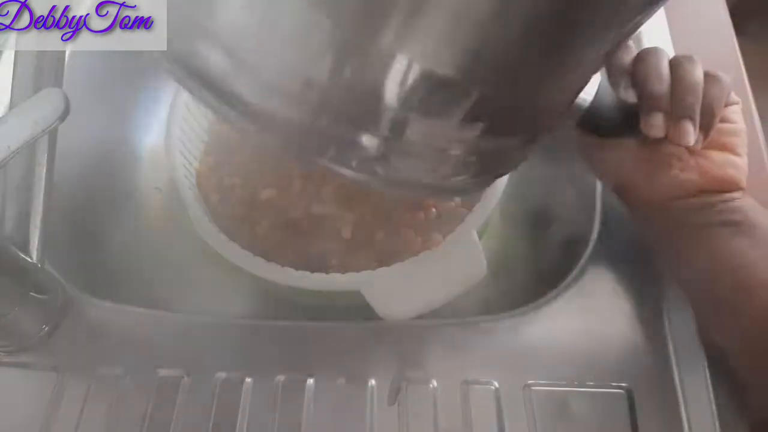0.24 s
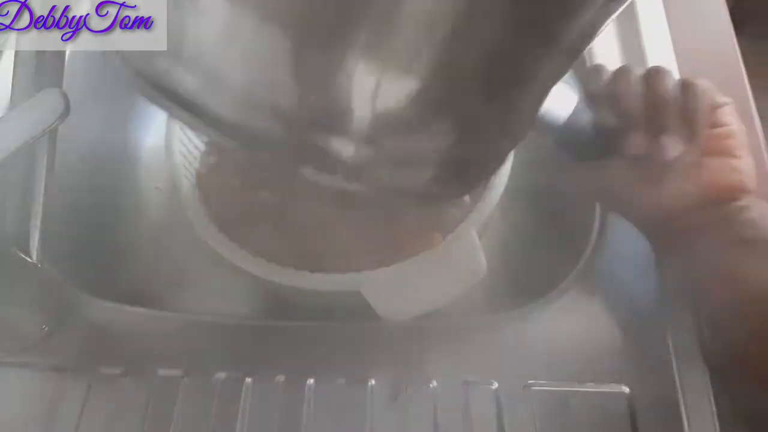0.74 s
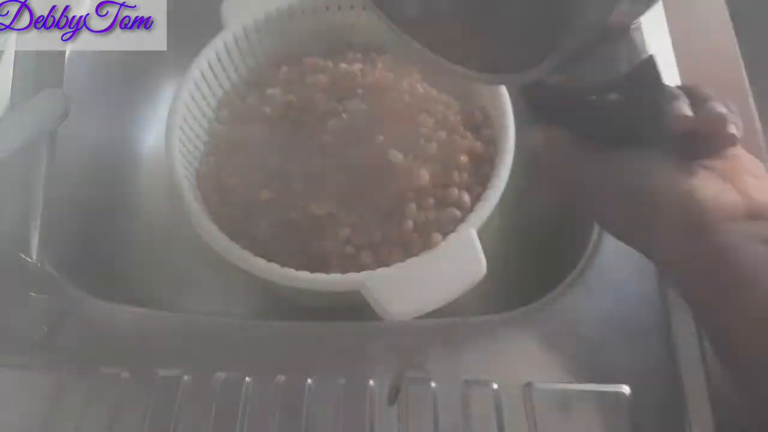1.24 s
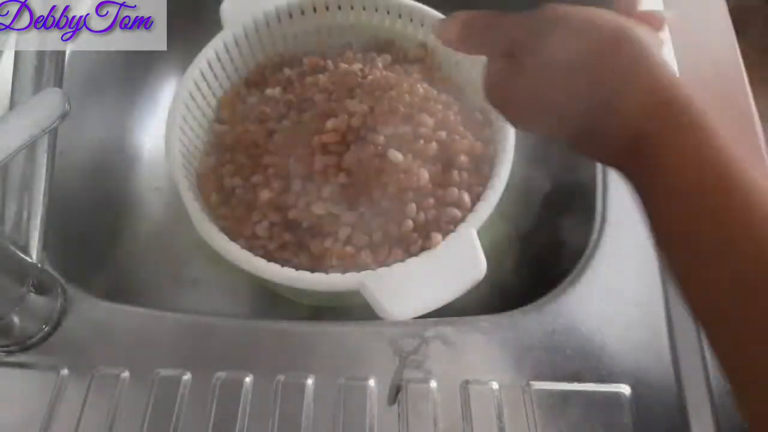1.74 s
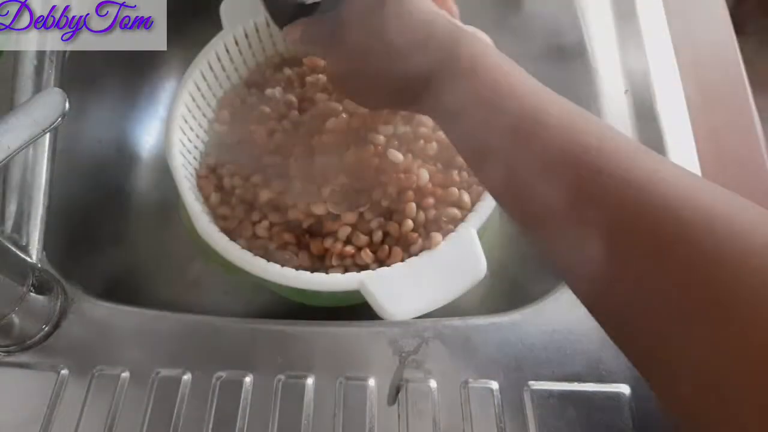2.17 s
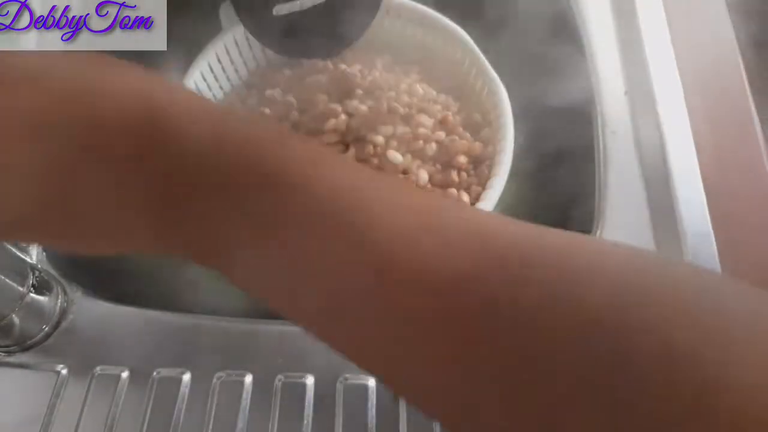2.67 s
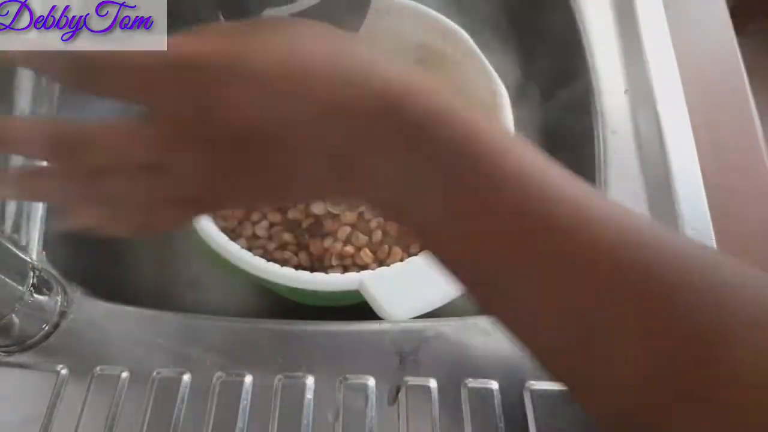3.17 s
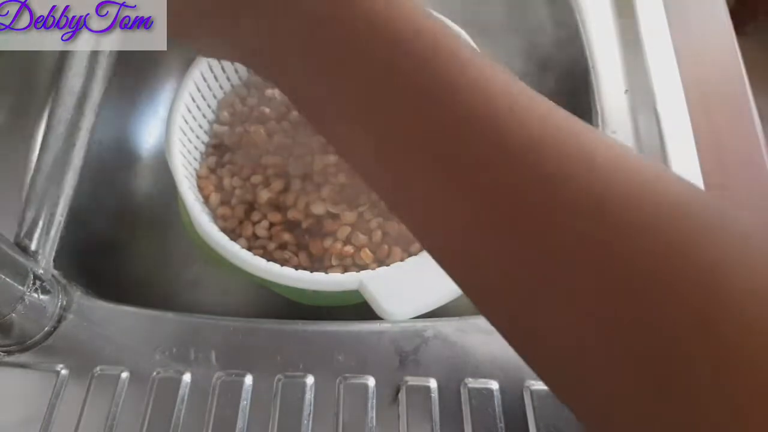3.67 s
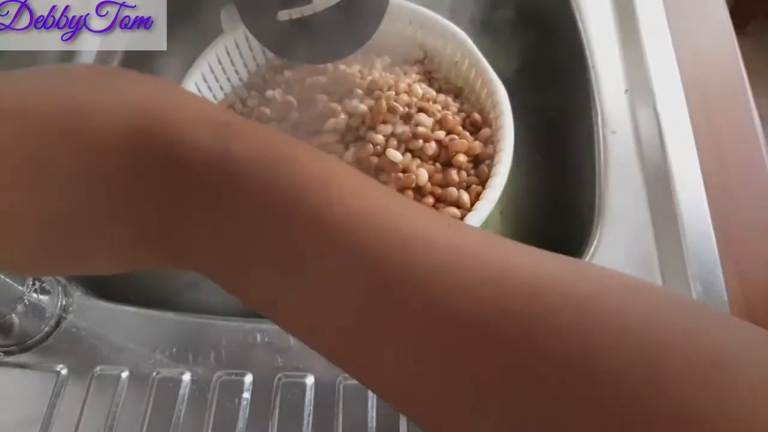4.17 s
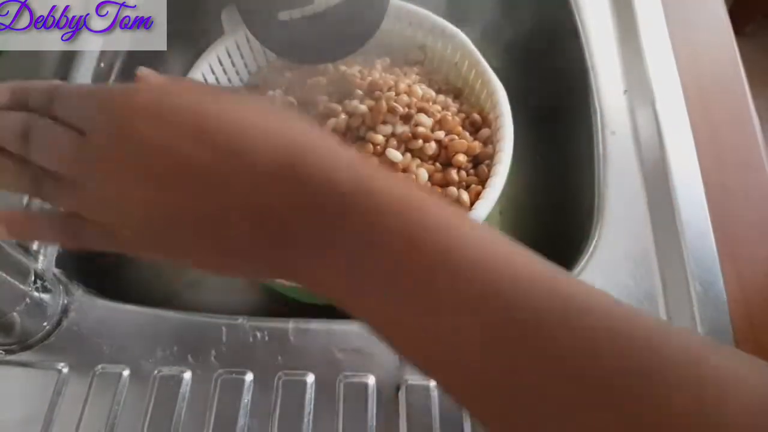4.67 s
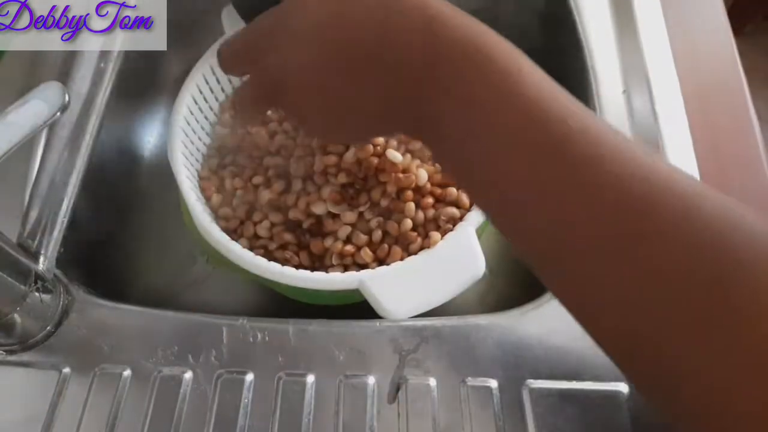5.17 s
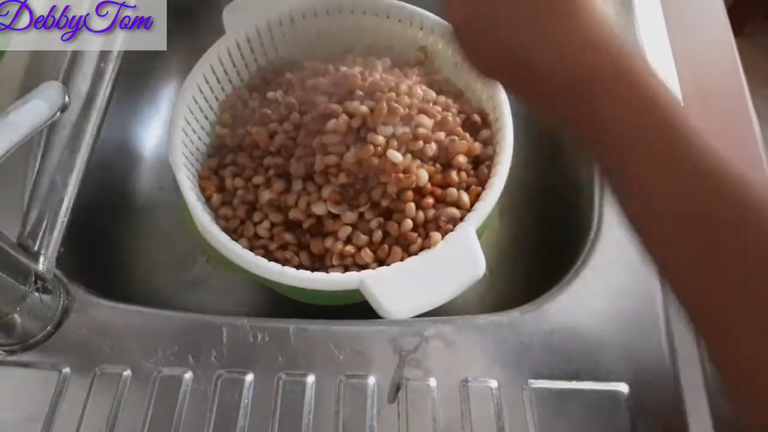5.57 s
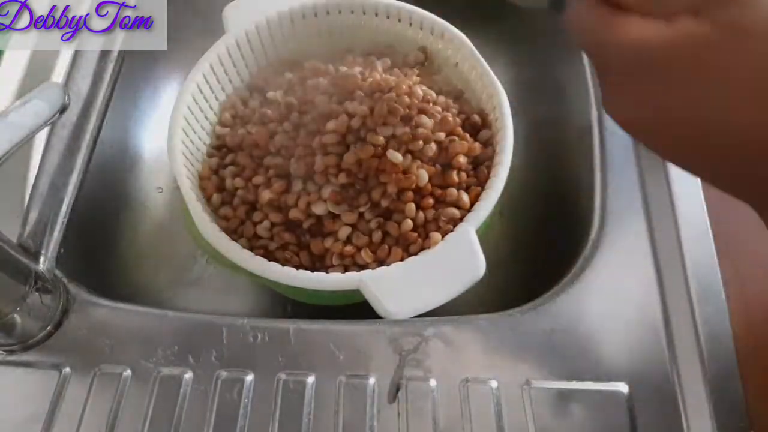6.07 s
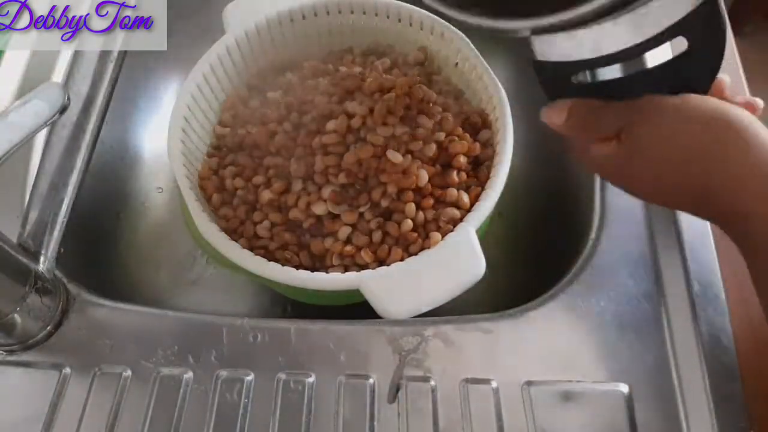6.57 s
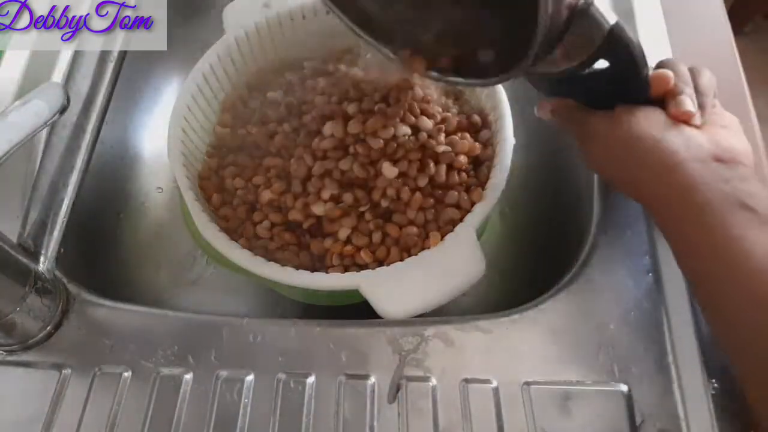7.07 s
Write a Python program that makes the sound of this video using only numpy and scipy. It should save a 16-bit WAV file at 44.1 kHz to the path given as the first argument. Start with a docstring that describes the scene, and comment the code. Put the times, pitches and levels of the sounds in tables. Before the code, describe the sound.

A metal pot is emptied over wet beans, with soft drumming and bubbling on the steel basin. A loud boomy knock comes next, with a brief low-mid resonant hum, then handling knocks and a steady tap stream lasting under two seconds. After it stops there are muffled thuds and a quieter gap, a sharp metal clatter, and fresh splashing. Close microphones, small kitchen with short hard reflections.

```python
"""Water drums on a steel sink as a pot is emptied over beans in a plastic colander, refilled and emptied again.
Drumming and gurgling are resonances fed by random drops; spray is banded hiss, the tap a smooth noise jet.
Splashes and drops are dying bursts of patter; water keeps single resonances sounding as narrow held tones.
Pot, hands and tap lever knock against the steel: short blows set basin and pot modes ringing
and are reflected by the kitchen."""
import sys
import numpy as np
from scipy import signal
from scipy.io import wavfile

SR = 44100
rng = np.random.default_rng(int(sys.argv[2]) if len(sys.argv) > 2 else 0)


def dump_mix(stems):
    """Bounce the given channels to the path in sys.argv[1] as a 16-bit WAV at rate SR."""
    frames = np.atleast_2d(stems).T  # one column per channel
    limited = np.clip(frames, -1, 1)  # hard clip at full scale
    pcm = np.round(limited * 32767).astype(np.int16)
    wavfile.write(sys.argv[1], SR, pcm)


N = 323253

# modes of the steel basin: (pitch [Hz], level [dB], decay t60 [s])
BASIN = [(100, -3.5, 0.13), (172, -1.5, 0.031), (200, -1, 0.062), (245.5, -7.5, 0.077), (331, 4.5, 0.032),
         (371, 5.5, 0.038), (490, -1, 0.04), (553, -4, 0.066), (631, -7.5, 0.12), (796, -12.5, 0.15)]
# modes of the steel pot ringing freely: (pitch [Hz], level [dB], decay t60 before damping [s])
POT = [(825, -7, 0.3), (1000, 1, 0.2), (1075, 0, 0.1), (1225, -14, 0.1), (1650, -3, 0.2),
       (1830, -4.5, 0.031), (2230, -7, 0.035), (2500, -12.5, 0.047), (2720, -11, 0.03), (3340, -18, 0.08),
       (3770, -11.5, .05), (4270, -15, 0.07), (4700, -22, 0.06)]
TAP_OPENS_S = 2.972


def from_db(db):
    """Decibels to gain."""
    return 10 ** (np.asarray(db) / 20)


def rms_one(x):
    """Scale to rms 1."""
    return x / np.sqrt(np.mean(x ** 2) + 1e-20)


def level_one(pair):
    """Scale a stereo pair so that its middle has rms 1."""
    return pair / np.sqrt(np.mean(pair.mean(axis=0) ** 2))


def in_time(rows):
    """Each column of a curve, sample by sample."""
    s, *columns = np.transpose(rows)
    return [np.interp(np.arange(N) / SR, s, column) for column in columns]


def at_hz(points, hz):
    """Read a spectrum on a log-frequency axis."""
    points_hz, values = np.transpose(points)
    return np.interp(np.log(hz), np.log(points_hz), values)


def drift(rate):
    """Slow random wander of rms 1, faster for a higher rate: smoothed noise drawn every 40 samples."""
    r = np.exp(-80 * np.pi * rate / SR)
    noise = rng.standard_normal(N // 40 + 2002)
    slow = signal.lfilter([1], [1, -2 * r, r * r], noise)[2000:]  # skip the filter's settling
    return np.interp(np.arange(N) / 40, np.arange(len(slow)), rms_one(slow))


def ring(clicks, hz, t60):
    """A unit click sets a sine ringing that starts at height 1 and dies by 60 dB in t60 seconds."""
    r, w = 10 ** (-3 / (t60 * SR)), 2 * np.pi * hz / SR
    return signal.lfilter([0, np.sin(w)], [1, -2 * r * np.cos(w), r * r], clicks + 1e-18)


def spread(mid_side, hz):
    """Two unrelated signals become left and right as alike as the microphones hear this pitch."""
    # (pitch [Hz], left-right likeness [-1 to 1])
    likeness = [(60, 0.69), (250, 0.9), (500, 0.81), (1000, -0.074), (16000, 0.0052)]
    # (pitch [Hz], left minus right [dB])
    lean = [(60, 22.5), (250, -1), (1000, 3.5), (4000, 2.5), (12000, 3.5)]
    signs = np.array([[1], [-1]])
    alike = np.clip(at_hz(likeness, hz), -1, 1)
    pair = np.sqrt(1 + alike) * mid_side[0] + np.sqrt(1 - alike) * mid_side[1] * signs
    return pair * from_db(at_hz(lean, hz) / 2 * signs)


def grains(per_s, uneven_db):
    """Random clicks of uneven size, two unrelated rows."""
    uneven = from_db(uneven_db * np.minimum(rng.exponential(1, (2, N)), 4))
    sizes = uneven * rng.standard_normal((2, N))
    return sizes * (rng.random((2, N)) < per_s / SR)


def banded(source, spectrum, patchy_db, rate):
    """Roughly half-octave bands of a noise, each with its own level and flicker."""
    together = drift(rate)
    lowest, highest = spectrum[0][0], spectrum[-1][0]
    edge_count = int(2 * np.log2(highest / lowest)) + 2
    edges = np.geomspace(lowest, min(highest * 1.1, .45 * SR), edge_count)
    out = 0
    for k, (low, high) in enumerate(zip(edges, edges[1:])):
        sos = signal.butter(2, [low, high], "band", fs=SR, output="sos")
        band = signal.sosfilt(sos, np.roll(source, 4001 * k, axis=1))  # shifted, so bands are unrelated
        hz = np.sqrt(low * high)
        flicker_db = patchy_db * (0.76 * together + drift(rate))
        out = out + from_db(at_hz(spectrum, hz) + flicker_db) * spread(band, hz)
    return level_one(out)


def rumble(modes, per_s, patchy_db, damping):
    """Dense drops keep a set of modes sounding; each mode swells and fades on its own."""
    patter = grains(per_s, uneven_db=0.5) * from_db(patchy_db * drift(7.2))
    out = 0
    for k, (hz, db, t60) in enumerate(modes):
        own = np.roll(patter, 3001 * k, axis=1) * from_db(patchy_db * drift(4))
        sounding = rms_one(ring(own, hz, damping * t60))  # damping is the share of t60 left
        out = out + from_db(db) * spread(sounding, hz)
    return level_one(out)


def ticks(per_s, low_hz, high_hz, cycles, tilt_db, clump_db):
    """Random clicks in clumps, dealt to resonators spread in pitch, each ringing for some cycles."""
    born = grains(per_s * from_db(clump_db * drift(18)), uneven_db=2.4)
    dealt = rng.integers(0, 18, N)
    out = 0
    for k, hz in enumerate(np.geomspace(low_hz, high_hz, num=18)):
        tick = ring(born * (dealt == k), hz, cycles / hz)
        out = out + from_db(tilt_db * np.log2(hz / 1000)) * spread(tick, hz)  # tilt per octave
    return level_one(out)


def bursts(rows, crest_db, rise_s):
    """Dying bursts of dense patter, each in its own band."""
    out, t = np.zeros((2, N + SR)), np.arange(SR // 2) / SR
    patter = grains(6000, uneven_db=2.0)
    for s, db, low_hz, high_hz, t60 in rows:
        i = int(s * SR)
        sos = signal.butter(2, [low_hz, high_hz], "band", fs=SR, output="sos")
        burst = signal.sosfilt(sos, np.roll(patter, -i, axis=1)[:, :len(t)])
        burst = level_one(spread(burst, np.sqrt(low_hz * high_hz)))
        shape = 10 ** (-3 * t / t60) * np.minimum(t / rise_s, 1)
        out[:, i:i + len(t)] += from_db(db - crest_db) * burst * shape  # crest: peak above rms
    return out[:, :N]


def kitchen(x):
    """Reflections of basin and walls: a dying noise tail for each side, weak in the bass."""
    t60_s, first_reflection_s = 0.19, .002
    t = np.arange(SR // 2) / SR
    tail = rng.standard_normal((2, len(t))) * 10 ** (-3 * t / t60_s) * (t > first_reflection_s)
    tail = signal.sosfilt(signal.butter(2, 500, "high", fs=SR, output="sos"), tail)
    return signal.fftconvolve(x, tail / np.sqrt(np.sum(tail ** 2) / 2), axes=1)[:, :N]


def cabinet_boom():
    """Dense drops excite the lowest modes of the sink cabinet."""
    # (pitch [Hz], level [dB], decay t60 before damping [s])
    cabinet = [(47, -13, 0.45), (100.7, -2, 0.43)]
    # (time [s], level [dB])
    booming = [(0.0, -46), (0.39, -44), (0.69, -35), (0.94, -43), (2.25, -44), (2.41, -27.5), (2.53, -48),
               (3.35, -47.5), (3.47, -39.5), (4.57, -40), (5.27, -37.5), (5.65, -41), (5.84, -49.5),
               (6.08, -49.5), (7.23, -37), (7.33, -31)]
    return from_db(in_time(booming)[0]) * rumble(cabinet, 3000, patchy_db=-1.1, damping=0.46)


def held_tones():
    """Narrow tones held for a moment, as water keeps single resonances of pot and sink sounding."""
    # (start [s], length [s], level [dB], pitch [Hz])
    tones = [(0.264, 0.19, -41, 720), (1.215, 0.25, -53, 1840), (1.644, 0.094, -44.5, 1160),
             (1.844, 0.079, -46, 1830), (1.34, 0.16, -52, 2750), (1.69, 0.1, -53, 4370),
             (1.7, 0.21, -55, 3210), (1.996, 0.13, -50, 784), (2.427, 0.32, -28.5, 416),
             (5.01, .06, -55, 1720), (5.333, 0.12, -46, 2480), (5.34, 0.13, -54, 2230),
             (5.497, 0.065, -50.5, 2220), (5.611, 0.05, -54.5, 1820)]
    out = np.zeros((2, N))
    patter = grains(3000, uneven_db=2.5) * from_db(2.5 * drift(27))
    for s, length, db, hz in tones:
        t = np.arange(int(length * SR)) / SR
        i = int(s * SR)
        tone = level_one(spread(ring(patter[:, i:i + len(t)], hz, 0.032), hz))
        fades = np.minimum(np.minimum(t, length - t) / (0.075 * length), 1)
        out[:, i:i + len(t)] += from_db(db) * fades * tone
    return out


def clanks():
    """Each blow strikes every pot mode, which swells within a few cycles and wavers with the sloshing water."""
    # a harder contact tilts the ring upwards: (time [s], strike level at 1 kHz [dB], tilt [dB per octave])
    blows = [(6.357, -28.5, -3), (6.376, -26.5, 0), (6.587, -33, 13.5), (6.591, -14.5, 2),
             (6.638, -36, -36), (6.67, -36, -39)]
    held_damping = 0.55  # share of the free ring left by the gripping hand
    s, strike_db, tilt_db = np.transpose(blows)
    chance_db = 1.0 * rng.standard_normal((len(s), len(POT)))
    out = 0
    for k, (hz, db, t60) in enumerate(POT):
        clicks = np.zeros(N)
        clicks[(s * SR).astype(int)] = from_db(strike_db + db + tilt_db * np.log2(hz / 1000) + chance_db[:, k])
        ringing = ring(clicks, hz, held_damping * t60)
        swelling = signal.lfilter(*signal.iirpeak(hz, 5.0, fs=SR), ringing)
        out = out + from_db(3.0 * drift(25)) * swelling
    return out * from_db([[1.2], [-1.2]])  # slightly to the left


def knocks():
    """The padded contact bounces briefly at its own pitch, heard directly and through the basin modes near it."""
    # (time [s], peak level [dB], bounce pitch [Hz], contact time [cycles], left minus right [dB])
    blows = [(0.408, -26.5, 315, 1.8, 0), (1.387, -21.5, 107, 0.17, -26.5), (2.295, 0.5, 147, 0.2, 8.5),
             (2.712, -15.5, 114, 0.071, 7), (2.829, -23, 90.5, 0.14, 7), (2.969, -18.5, 285, 0.41, -2),
             (2.983, -14.5, 330, 0.14, 6.5), (3.046, -24, 364, 0.64, -1), (3.352, -11, 170, 0.39, 5.5),
             (3.433, -15, 360, 0.44, 3), (3.565, -1.5, 390, 0.28, 6.5), (4.124, -1, 296, 0.17, 4),
             (4.534, -21, 507, 2.1, -1), (4.709, -13, 154, 0.084, -3), (4.724, -10, 90, 0.13, 6),
             (4.736, -18.5, 48.5, 1.0, 9), (5.001, -18, 346, 1.5, 0), (5.185, -8, 143, 0.16, 6.5),
             (5.23, -21.5, 45.3, 0.9, 8), (5.539, -30, 181, 2.3, 3), (6.356, -8.5, 481, 3.2, -3),
             (6.366, -12.5, 448, 0.87, 0), (6.4, -25, 463, 2.2, 1), (6.426, -25, 487, 2.7, -3),
             (6.973, -22, 290, 0.32, 3), (7.08, -19.5, 331, 0.097, 3), (7.243, -2.5, 200, 0.36, 7)]
    out, t = np.zeros((2, N + SR)), np.arange(SR // 4) / SR
    for s, db, hz, cycles, pan_db in blows:
        bounce = t * np.exp(-t * hz / cycles) * np.sin(2 * np.pi * hz * t)
        basin = sum(from_db(mode_db) * ring(bounce, mode_hz, t60) for mode_hz, mode_db, t60 in BASIN)
        sound = basin / np.abs(basin).max() - from_db(-1.5) * bounce / np.abs(bounce).max()
        i = int(s * SR)
        sides = from_db(db + pan_db * np.array([[.5], [-.5]]))
        out[:, i:i + len(t)] += sides * sound / np.abs(sound).max()
    return out[:, :N]


def pitched_drops():
    """Single drops: short bursts of patter in a band narrow enough to have a pitch."""
    # (time [s], peak level [dB], pitch [Hz])
    falling = [(0.272, -27, 1850), (0.4266, -27.5, 1790), (0.859, -33, 1370), (1.056, -32, 1086),
               (1.695, -26, 1800), (5.679, -38, 1640), (5.912, -34, 1190), (6.0473, -26.5, 2490),
               (6.322, -32, 2180), (6.439, -21, 2030), (6.483, -23, 2380), (6.537, -29, 3020),
               (6.541, -36, 3700), (6.592, -16, 2930), (6.697, -19, 1310), (6.864, -32, 3770),
               (7.185, -24.5, 4700), (7.243, -15.5, 2200), (7.245, -25.5, 3680)]
    t60_s = 0.05
    rows = [(s, db, .96 * hz, 1.04 * hz, t60_s) for s, db, hz in falling]
    return bursts(rows, crest_db=4.0, rise_s=0.0015)


def steel(x):
    """Whatever splashes on the pot takes the colour of its upper modes."""
    rings = 0
    for hz, _, t60 in POT[4:]:
        q = hz * t60 * np.pi / np.log(1000)
        rings = rings + signal.lfilter(*signal.iirpeak(hz, q, fs=SR), x + 1e-18)
    return from_db(-4.0) * x + from_db(5.0) * rings


def splashes():
    """Broad bursts of patter, coloured by the pot's steel."""
    # (time [s], peak level before the steel [dB], low edge [Hz], high edge [Hz], decay t60 [s])
    rows = [(.336, -28.5, 500, 2200, 0.069), (.512, -27.5, 700, 2430, 0.11), (.63, -14, 560, 1390, 0.048),
            (.838, -27.5, 640, 1390, 0.12), (1.669, -25, 3500, 13900, 0.07),
            (2.04, -31.5, 1900, 6200, 0.22), (2.293, -11.5, 797, 8000, 0.042),
            (2.71, -31, 596, 3100, 0.075), (2.805, -36.5, 900, 8850, 0.13),
            (2.98, -10.5, 796, 15000, 0.042), (5.0, -33, 1450, 4580, 0.25), (5.18, -27, 700, 4400, 0.072),
            (5.238, -21.5, 900, 12500, 0.09), (5.345, -37, 1560, 8750, 1), (5.52, -38, 1380, 5240, 0.18),
            (6.042, -23.5, 1840, 12700, 0.18), (6.357, -7, 2270, 14700, 0.047),
            (6.587, -12.5, 2090, 12500, 0.14), (6.70, -24.5, 3000, 14000, 0.074),
            (6.838, -30, 2420, 12800, 0.47), (6.968, -18.5, 490, 15500, 0.49),
            (7.044, -13, 800, 1250, 0.063), (7.081, -15.5, 600, 1260, 0.078),
            (7.183, -19, 2930, 14400, 0.06), (7.243, -18, 1460, 7700, 0.041),
            (7.277, -21.5, 900, 14100, 0.087)]
    return steel(bursts(rows, crest_db=9.0, rise_s=0.00073))


def running():
    """Gain while the tap is open: quick attack, steep fall when shut."""
    attack_s, shuts_s, dies_db_per_s = 0.016, 4.697, 252
    t = np.arange(N) / SR
    opening = np.clip((t - TAP_OPENS_S) / attack_s, 0, 1) ** 2
    return opening * from_db(-dies_db_per_s * np.maximum(t - shuts_s, 0))


def tap():
    """A smooth aerated jet, growing as the pot fills, also sets the pot's wall singing faintly."""
    # (pitch [Hz], level per Hz [dB])
    spectrum = [(350, -42), (800, -37), (1340, -12), (1670, -20.5), (2690, -1), (8330, -4), (11700, -2),
                (15600, -3.5)]
    opening_db, grows_db_per_s, full_s = -29.5, 8.5, 3.716  # the jet stops growing at full_s
    jet = banded(rng.standard_normal((2, N)), spectrum, patchy_db=1.5, rate=14.3)
    level_db = opening_db + grows_db_per_s * (np.minimum(np.arange(N) / SR, full_s) - TAP_OPENS_S)
    wall = [(hz, db + 11.5 * np.log2(hz / 1000), t60) for hz, db, t60 in POT[:12]]  # brighter
    singing = from_db(-9.0) * rumble(wall, 6000, patchy_db=2.0, damping=0.25)
    return running() * from_db(level_db) * (jet + singing)


def spray():
    """Fine droplets hiss and colour the pot's upper modes; beans tick against each other."""
    # (pitch [Hz], level per Hz [dB])
    spectrum = [(1300, -45), (1900, -12), (2600, -3.5), (4400, -2.5), (6500, -3), (9500, -8.5),
                (12000, -0.5), (15600, -13.5)]
    hiss = banded(grains(9800, uneven_db=2.5), spectrum, patchy_db=2.5, rate=12.3)
    wall = from_db(-4.0) * rumble(POT[5:], 3000, patchy_db=3.0, damping=0.55)
    beans = from_db(-5.5) * ticks(500, 1570, 5380, cycles=60.0, tilt_db=7.0, clump_db=8.0)
    return level_one(hiss + wall + beans)


def gurgle():
    """Bubbles in the wet beans; the rushing water also sounds the pot."""
    bubbles = ticks(3000, 700, 2700, cycles=16.0, tilt_db=-2.0, clump_db=3.0)
    pot = from_db(-5.0) * rumble(POT, 3000, patchy_db=2.0, damping=0.7)
    return level_one(bubbles + pot)


def churning_gain():
    """Gain of the churning in the filling pot, only while the tap runs."""
    # (time [s], level [dB])
    churning = [(3.0, -47), (3.118, -62), (3.71, -57), (3.77, -35), (3.97, -35), (4.2, -46), (4.59, -47),
                (4.7, -35.5)]
    return running() * from_db(in_time(churning)[0])


def basin_drumming():
    """Falling water drums on the basin and keeps all its modes but the lowest sounding."""
    return rumble(BASIN[1:], 1500, patchy_db=2.5, damping=1.0)


def gushes():
    """Power of drumming, gurgle and spray: each gush starts fast, holds and dies away."""
    # (start [s], length [s], drumming [dB], gurgle [dB], spray [dB])
    rows = [(0.236, 0.25, -44.5, -55, -50.5), (1.197, 0.21, -43.5, -59, -50.5),
            (1.651, 0.07, -45, -41, -49), (2.285, 0.18, -30, -36, -45.5), (2.604, 0.13, -32.5, -51.5, -60),
            (3.55, 0.072, -26.5, -33, -58), (5.33, 0.1, -37, -48, -47.5), (6.346, 0.096, -39, -39.5, -36),
            (6.573, 0.027, -38, -36.5, -26.5), (6.957, 0.14, -31.5, -43, -37),
            (7.237, 0.042, -25, -29, -57)]
    attack_s, dies_db_per_s = 0.012, 185
    power, t = 0, np.arange(N) / SR
    for s, length, *dbs in rows:
        attack = np.clip((t - s) / attack_s, 0, 1)
        shape = attack * from_db(-dies_db_per_s * np.maximum(t - s - length, 0))
        power = power + np.outer(from_db(dbs), shape) ** 2
    return power


def poured_gains():
    """Gains of drumming, gurgle and spray: slow curves with sudden gushes added in power."""
    # water on the basin: (time [s], level [dB])
    drumming = [(0.0, -48.5), (0.33, -51.5), (0.49, -34.5), (0.57, -34.5), (1.0, -51), (1.2, -52),
                (1.45, -42.5), (2.23, -45), (2.33, -38), (2.47, -38), (2.57, -47), (2.78, -43.5),
                (3.35, -36), (3.45, -35.5), (4.5, -33), (4.56, -27), (4.8, -36), (5.12, -27), (5.25, -29.5),
                (5.37, -46.5), (5.78, -53), (6.39, -59.5), (6.53, -50.5), (6.92, -51.5), (7.19, -55),
                (7.33, -50)]
    # loose water, one list before and one after the tap runs: (time [s], gurgle [dB], spray [dB])
    loose_water = [
        [(0.0, -100, -54), (0.27, -46, -60), (0.41, -37, -49.5), (0.51, -41, -55.5), (0.64, -38.5, -56),
         (0.77, -54.5, -59.5), (1.09, -59.5, -57.5), (1.32, -61, -57.5), (1.89, -39, -46), (2.18, -51, -53.5),
         (2.32, -75, -53.5), (2.51, -44.5, -65), (2.75, -63, -64), (2.96, -57, -54)],
        [(4.8, -56, -52.5), (5.0, -65, -53), (5.24, -42.5, -47.5), (5.32, -61, -56.5), (5.64, -71, -57.5),
         (6.04, -53, -60), (6.15, -65, -56), (6.39, -92, -61), (6.52, -71, -41.5), (6.56, -46, -42),
         (6.74, -62, -46.5), (6.93, -55, -65), (7.17, -54, -52), (7.33, -51, -44)],
    ]
    steady = from_db(in_time(drumming) + in_time(np.concatenate(loose_water)))
    return np.sqrt(steady ** 2 + gushes())


def scene():
    """Water layers on their curves and gushes, held tones, then the blows with their reflections."""
    drum_gain, gurgle_gain, spray_gain = poured_gains()
    water = cabinet_boom() + drum_gain * basin_drumming()
    water = water + np.hypot(gurgle_gain, churning_gain()) * gurgle()
    water = water + spray_gain * spray() + tap()
    water = water + pitched_drops() + splashes()
    hits = knocks() + clanks()
    return water + held_tones() + hits + from_db(-5) * kitchen(hits)


def record(dry):
    """The microphones lose the deepest bass, peaks are rounded, the top is cut."""
    dry = signal.sosfilt(signal.butter(3, 38, "high", fs=SR, output="sos"), dry)
    rounded = 1.24 * np.tanh(dry / 1.275)
    return signal.sosfilt(signal.cheby2(14, 70, 16100, fs=SR, output="sos"), rounded)


dry = scene()
out = record(dry)
dump_mix(out)
```